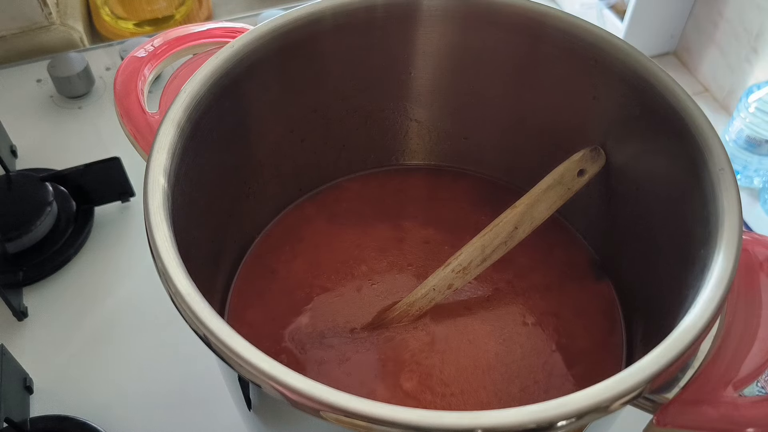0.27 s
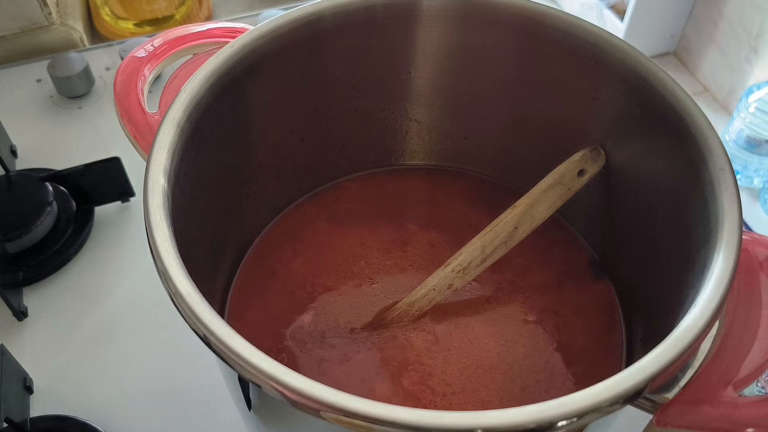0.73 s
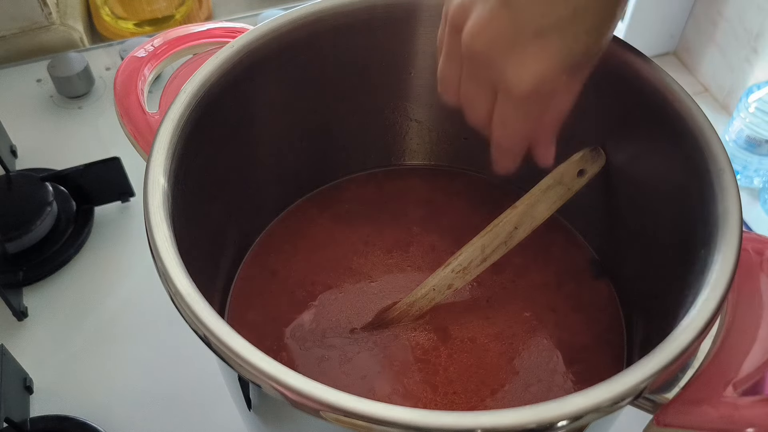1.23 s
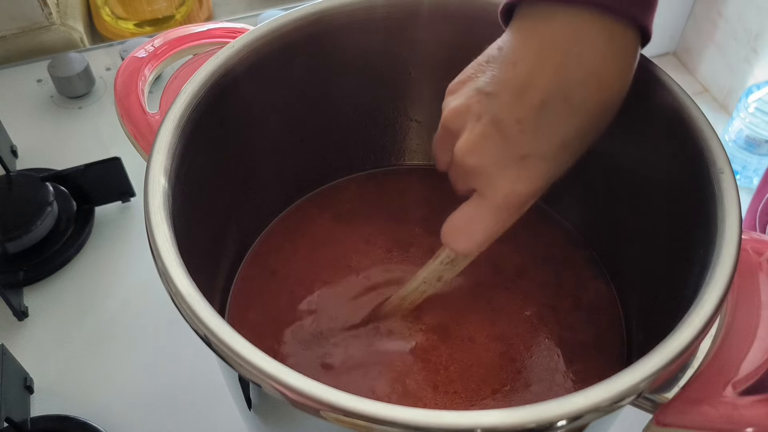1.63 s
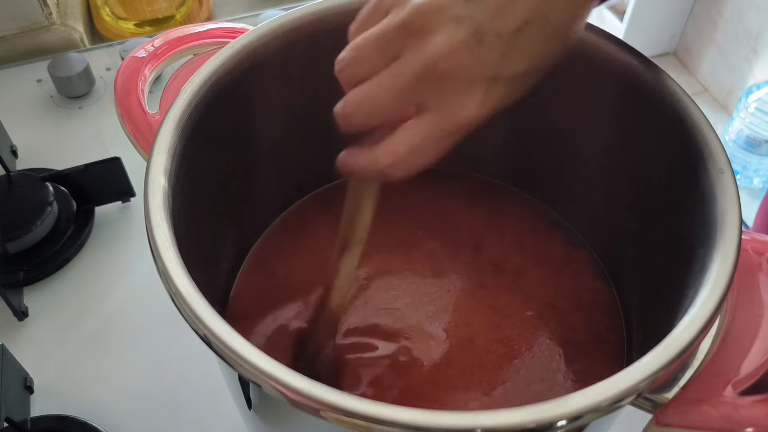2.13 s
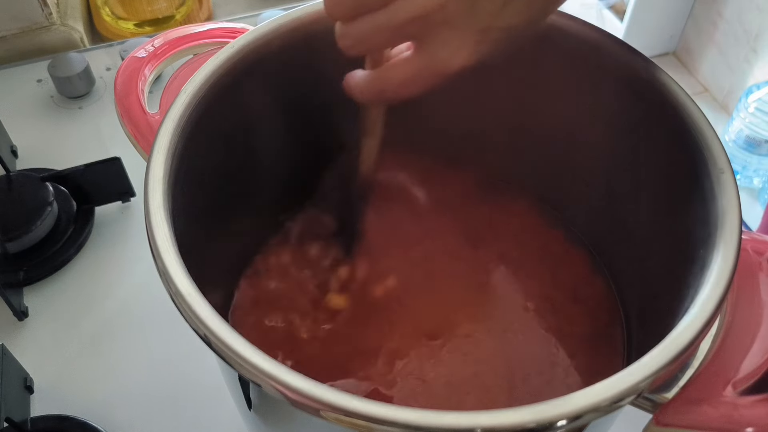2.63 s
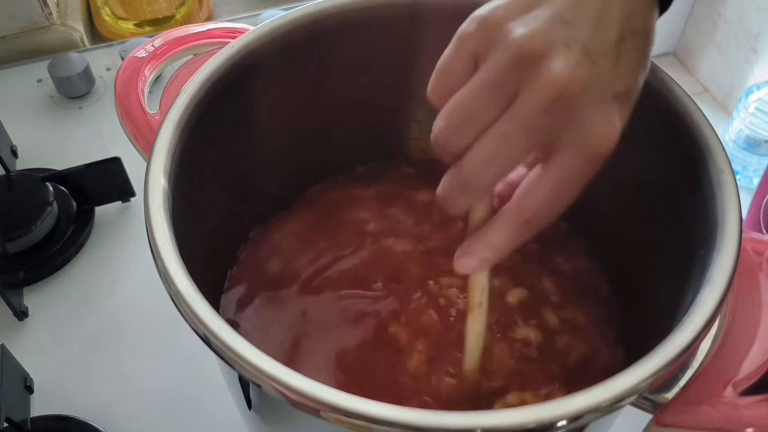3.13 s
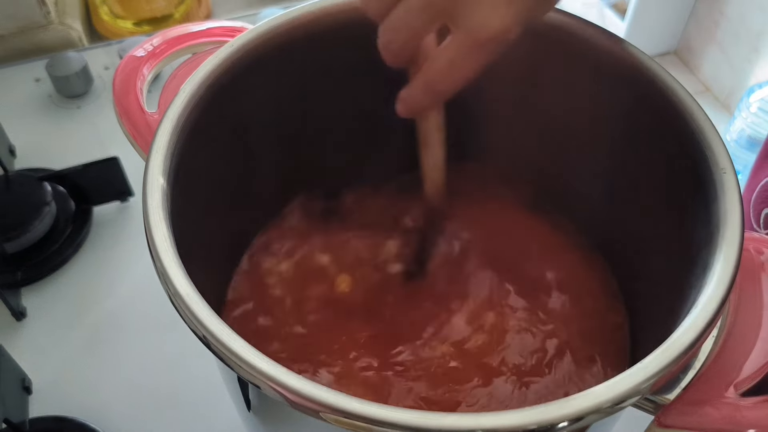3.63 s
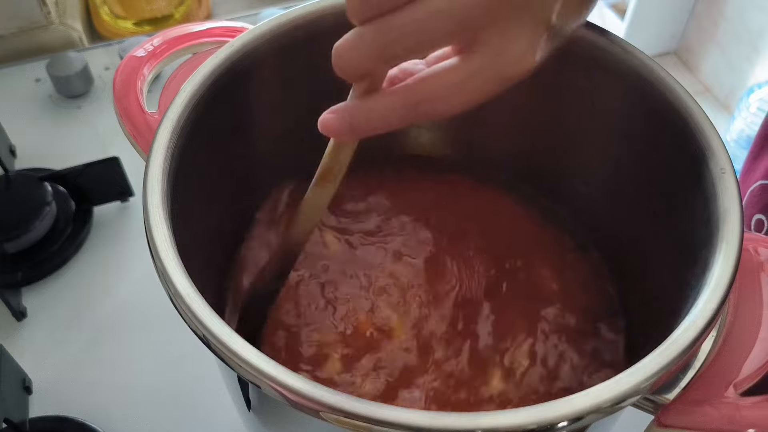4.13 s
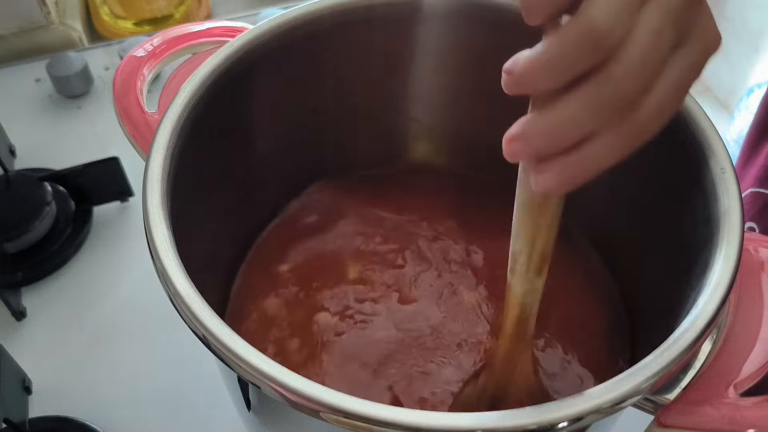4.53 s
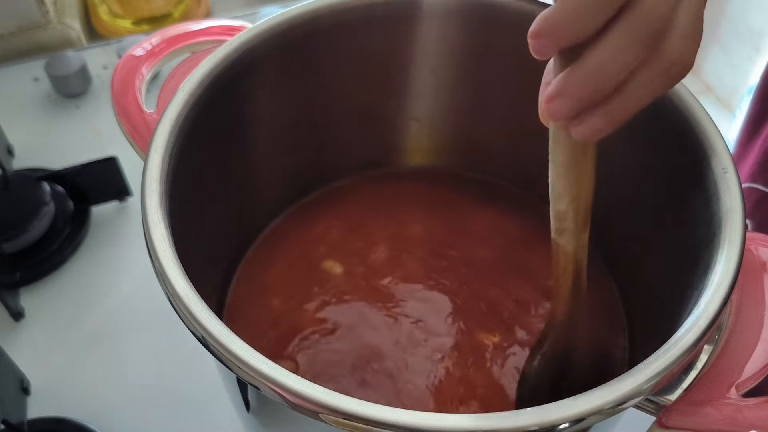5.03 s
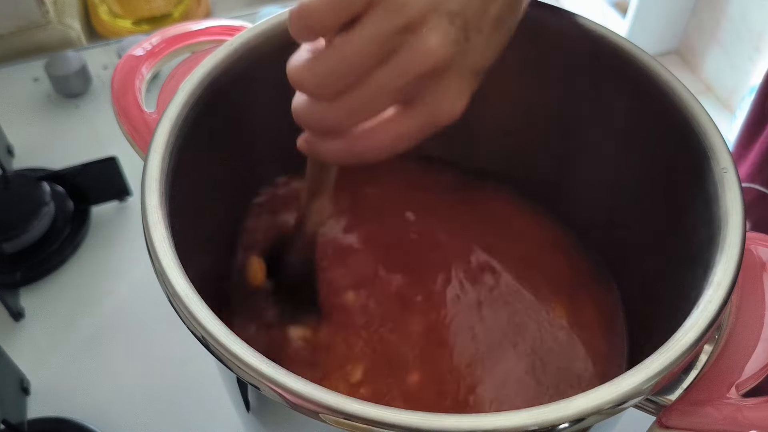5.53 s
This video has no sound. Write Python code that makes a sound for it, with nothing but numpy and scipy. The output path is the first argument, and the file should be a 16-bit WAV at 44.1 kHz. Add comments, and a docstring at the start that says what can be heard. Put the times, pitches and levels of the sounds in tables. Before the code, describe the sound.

A metal lid clatters down on a stove grate, then after a pause a spoon stirs watery stew with plops, ticks and soft pot knocks.

```python
"""A wooden spoon stirs watery stew in a tall steel pot: ringing air pockets plop, tiny bubbles crack and tick,
flowing noise and minute grains make the swish, and damped modes ring as the spoon bumps the wall.
Before the stirring, a steel lid clanks down on the hob nearby: bursts of rattle with ringing metal modes.
Throughout, the gas burner rushes as coloured noise and a fridge hums in unsteady tones in the small kitchen,
over the microphones' own faint, peaked hiss."""
import sys
import numpy as np
from scipy import signal
from scipy.fft import rfft, irfft, next_fast_len
from scipy.io import wavfile
from scipy.ndimage import map_coordinates

SR = 44100
rng = np.random.default_rng(int(sys.argv[2]) if len(sys.argv) > 2 else 0)


def digitize_waveform(pressure):
    """Quantize a signal to 16-bit integers and store it at the path in sys.argv[1].

    Rows of a 2-D input are taken as channels; values are limited to [-1, 1].
    """
    field = np.atleast_2d(pressure).T
    bounded = np.clip(field, -1, 1)
    quanta = np.round(bounded * 32767).astype(np.int16)
    wavfile.write(sys.argv[1], SR, quanta)


N = 255118  # length in samples
T = np.arange(SR // 2) / SR  # clock of one short sound, in seconds

# Burner and kitchen air, tone colour. Each row: frequency in Hz, relative level in dB.
AIR_COLOUR = [(25, -27), (45, -22), (75, -1), (130, 0), (250, -0.5), (400, -2), (750, -11.5), (1400, -9),
              (2100, -16), (3000, -21.5), (3700, -15.5), (4800, -17.5), (7000, -19), (9300, -13),
              (10300, -23), (16000, -18.5)]
# Narrow peaks in the microphones' own faint hiss. Each row: centre in Hz, width in Hz, relative level in dB.
HISS_PEAKS = [(1409, 63, -4), (5274, 300, -8.5), (6740, 170, -12.5), (8230, 102, -3), (9144, 284, -5.5),
              (12270, 250, -13.5)]
# Fridge motor and mains tones. Each row: frequency in Hz, typical rms level in dB.
FRIDGE_TONES = [(61.5, -70), (100, -59), (246, -69.5), (307.5, -72.5), (399, -77)]
# How alike left and right are in noise. Each row: frequency in Hz, likeness from -1 to 1.
STEREO_LIKENESS = [(60, 0.99), (150, 0.69), (380, 0.46), (950, -0.04), (2380, 0.0048), (5980, -0.019),
                   (15000, 0.01)]

# A steel lid set down on the hob's grate. Each row: start in seconds, clatter level in dB,
# lid ring level in dB, contact brightness in Hz.
LID_CLANKS = [(0.001, -30.5, -35.5, 2720), (0.026, -28, -35.5, 2160), (0.055, -33, -52, 1960),
              (0.067, -32.5, -74, 800), (0.2168, -27.5, -41.5, 2270), (0.2220, -26.5, -43, 2190),
              (0.2812, -36, -53, 4500), (0.284, -23.5, -49, 4070), (0.297, -41, -52, 3000),
              (0.342, -39, -65, 960), (0.414, -32, -82, 397)]
# Tone colour of the rattle. Each row: frequency in Hz, relative level in dB.
CLATTER_COLOUR = [(40, -52), (80, -43), (110, -11), (280, -9), (420, -11), (620, 5.5), (900, -7.5),
                  (1600, -6), (2300, -8.5), (3200, -17.5), (5500, -23), (9000, -16.5), (16000, -23)]
# Thud of the wooden worktop. Each row: mode in Hz, relative level in dB, t60 in seconds.
WORKTOP_MODES = [(109.3, -24, 0.63), (236, -15.5, 0.14), (269, -16.5, 0.18), (591, -1.5, 0.075),
                 (645, -0.5, 0.055), (766, -12, 0.064), (855, -19.5, 0.17), (1009, -20, 0.32),
                 (1406, -21, 0.18), (1604, -5.5, 0.07)]
# Ring of the lid. Each row: mode in Hz, relative level in dB, t60 in seconds.
LID_MODES = [(2223, 8.5, 0.21), (2110, -8, 0.054), (3210, -23.5, 0.71), (6900, -18, 0.4), (8200, -17, 0.15)]
# Ring of the grate. Each row: mode in Hz, relative level in dB, t60 in seconds.
GRATE_MODES = [(3616, -4.5, 0.27), (4420, 5, 0.098), (4448, 0, 0.083), (7290, -3, 0.18), (8270, 0, 0.073),
               (11040, 5, 0.077)]
GRATE_DB = -17  # the grate's ring against the clatter
# Echo of the kitchen. Each row: frequency in Hz, t60 in seconds.
KITCHEN_DECAY = [(150, 0.29), (700, 0.35), (3000, 0.28), (12000, 0.23)]

# How hard the stew is churned: brisk turns, slow ones, then brisk again.
# Each row: time in seconds, strength in dB.
CHURN_STRENGTH = [(2.3, -29), (2.55, -7), (2.82, 4), (3.03, 0), (3.2, -7), (3.6, -3), (3.95, -20),
                  (5.15, -20), (5.45, -5), (5.78, 0)]
# Large air pockets closing behind the spoon. Each row: start in seconds, ring level in dB,
# starting pitch in Hz, t60 in seconds, snap level in dB.
AIR_POCKETS = [(2.294, -47.5, 500, 0.03, -63), (2.5197, -43.5, 1643, 0.081, -37.5),
               (2.55, -44, 1520, 0.041, -38), (2.632, -29.5, 845, 0.021, -29.5),
               (2.701, -49, 515, 0.057, -50), (2.88, -29.5, 1057, 0.03, -24),
               (2.9596, -45, 1580, 0.016, -33), (2.9885, -37.5, 694, 0.026, -44),
               (3.748, -48, 408, 0.069, -62), (5.2843, -38, 1108, 0.049, -27),
               (5.294, -32.5, 1690, 0.019, -29), (5.399, -38, 518, 0.023, -60),
               (5.413, -48.5, 1920, .025, -45), (5.537, -52.5, 2270, 0.036, -43.5),
               (5.6328, -35.5, 987, 0.087, -35), (5.7344, -46.5, 1564, .067, -42)]
SNAP_HZ, SNAP_REF_DB, SNAP_DB_PER_OCTAVE = 3500, -31, 8.5  # a harder snap is brighter
# Standing waves in the air above the stew. Each row: centre in Hz, width in Hz, level in dB.
POT_AIR_MODES = [(704, 3.7, 5), (1108, 37, 2.5), (1470, 13, -9), (1662, 14, 6), (2117, 27, 10.5)]
# Echo of the air in the pot. Each row: frequency in Hz, t60 in seconds.
HOLLOW_DECAY = [(300, 0.17), (1000, 0.14), (2500, 0.072), (6000, 0.04), (14000, 0.02)]

# The spoon's blade sweeping through the surface. Each row: middle in seconds, level in dB,
# half length in seconds.
BLADE_SWEEPS = [(2.903, -57, 0.028), (3.774, -52, 0.06), (4.421, -58.5, 0.049), (4.897, -63, .046),
                (5.278, -65, .035)]
# Tone colour of the stew's wash. Each row: frequency in Hz, relative level in dB.
WASH_COLOUR = [(200, -34), (400, 3), (700, 0), (1000, -10), (1500, -7), (2400, -6), (3700, -6),
               (5000, -7.5), (6300, -0.5), (9000, -9.5), (12000, -9), (16000, -9)]
CHURN_WASH_DB = -64.5  # flow level at a churn of 0 dB

# Loud small bubbles bursting. Each row: start in seconds, relative level in dB, starting pitch in Hz,
# crack level against the ring in dB.
SMALL_BUBBLES = [(2.5448, -37, 4640, -2), (2.577, -34.5, 8270, -8), (2.7012, -36.5, 6050, -21),
                 (2.7067, -30.5, 5600, 2), (2.7252, -41.5, 5700, 7), (2.7516, -39, 4640, -12),
                 (2.8072, -40.5, 6660, -2), (2.85, -36.5, 5650, 7), (2.863, -36.5, 5850, 2),
                 (2.8937, -41, 4670, 11), (3.181, -45, 4370, 1), (3.3336, -35, 8500, -6),
                 (3.4342, -38.5, 3630, -4), (3.5932, -42.5, 6700, 3), (3.7997, -38.5, 5650, 9),
                 (5.2845, -32, 2560, 4), (5.467, -35, 6200, -9), (5.7135, -37.5, 8150, -8),
                 (5.733, -38, 3800, 3)]
CRACK_OVER_RING = 1.38  # a tiny bubble's crack lies higher than its ring

# The faint bubbles that churning leaves: typical level and pitch, and their scatter either way.
FAINT_TICK_DB, FAINT_TICK_HZ, FAINT_CRACK_DB = -47, 11050, 1
FAINT_PLOP_DB, FAINT_PLOP_HZ, FAINT_PLOP_T60_S, FAINT_SNAP_DB = -52, 1189, 0.045, -56
SCATTER_DB, SCATTER_OCTAVES = 6.5, 0.41

# The spoon bumping the pot. Each row: start in seconds, level in dB, contact brightness in Hz.
SPOON_BUMPS = [(4.32, -52.5, 700), (4.7497, -38.5, 3400), (4.759, -37, 605), (4.816, -45.5, 400),
               (5.250, -44, 450)]
# Ring of the filled pot. Each row: mode in Hz, relative level in dB, t60 in seconds.
POT_MODES = [(197.7, -12, 0.48), (240, -2, 0.18), (408, -10, 0.25), (443, -3.5, 0.099), (480, -0.5, 0.069),
             (626, -6.5, 0.11), (717, -13.5, 0.27), (913, -11.5, 0.19), (1125, -3, 0.11), (1400, -17, 0.14),
             (1717, -10, 0.12), (2900, 3, 0.024), (2950, -3, 0.024)]

# Colour of the two microphone ports. Each row: frequency in Hz, left gain in dB, right gain in dB.
PORT_COLOUR = [(430, 0.5, 0.5), (686, -1, -1.5), (1400, -1, 1), (2300, -2, -1), (4930, 2.5, 0.5),
               (5550, -1, 3), (7220, 2, 7), (7610, 0, 5.5), (8380, 9, -15.5), (8730, 3, -18), (9740, 0, -6),
               (10400, 0, -7), (11500, 0.5, -5), (14100, -5.5, -6.5)]
TOP_HZ = 16000  # nothing is kept from here up


def amp(db):
    """Decibels to gain."""
    return 10 ** (np.asarray(db) / 20)


def unit(x):
    """Bring x to rms 1."""
    return x / np.sqrt(np.mean(x ** 2) + 1e-20)


def along(points, hz):
    """Read (Hz, value) points at hz, on a log frequency axis."""
    f, value = np.transpose(points)
    return np.interp(np.log(hz + 1), np.log(f + 1), value)


def filtered(x, response):
    """Shape the spectrum of x by a response of frequency."""
    n = x.shape[-1]
    padded = next_fast_len(n + 8192)
    spectrum = rfft(x, padded) * response(np.fft.rfftfreq(padded, 1 / SR))
    return irfft(spectrum, padded)[..., :n]


def wobble(rate):
    """A smooth random curve with rate knots a second."""
    knots = rng.standard_normal(int(N * rate / SR) + 4)
    return map_coordinates(knots, [np.arange(N) * rate / SR])


def panned(lean_db):
    """Left and right gains; a positive lean favours the left."""
    return amp(np.array([[1], [-1]]) * lean_db / 2)


def noise(gain, size):
    """Coloured stereo noise of rms 1, near mono in the bass."""
    def mid_side_gains(hz):
        turn = np.arccos(np.clip(along(STEREO_LIKENESS, hz), -1, 1)) / 2
        return gain(hz) * np.array([np.cos(turn), np.sin(turn)])

    mid, side = filtered(rng.standard_normal((2, size)), mid_side_gains)
    return unit(np.array([mid + side, mid - side]))


def add(track, s, sound):
    """Mix a sound into the track at time s."""
    start = max(round(s * SR), 0)
    track[:, start:start + sound.shape[-1]] += sound[:, :max(N - start, 0)]


def ring(modes, contact, spread_hz):
    """Modes struck through a contact; high ones reach the two microphones out of step."""
    hz, db, t60 = np.transpose(modes)[:, :, None]
    phase = rng.standard_normal((2, len(modes), 1)) * np.minimum(hz / spread_hz, 2)
    level = amp(db + rng.standard_normal(hz.shape)) * contact(hz)
    partials = level * amp(-60 * T / t60) * np.sin(2 * np.pi * hz * T + phase)
    return np.sum(partials, axis=1) * (1 - np.exp(-T / 0.00067))


def echo(x, decay, delay):
    """A fresh diffuse tail for a short sound, each frequency dying at its own speed."""
    hz, t, cells = signal.stft(rng.standard_normal((2, len(T))), SR, nperseg=256)
    fading = cells * amp(-60 * t / along(decay, hz)[:, None])
    tail = signal.istft(fading, SR, nperseg=256)[1][:, :len(T)] * (T > delay)
    return signal.fftconvolve(x, tail / np.linalg.norm(tail[0]), axes=1)[:, :len(T)]


def ripple(hz, spacing_hz, depth_db):
    """Reflections from hob and walls comb a steady sound with fixed, randomly placed peaks and dips."""
    knots = rng.standard_normal(1024)
    curve = map_coordinates(knots, [hz / spacing_hz], mode="mirror")
    return amp(depth_db * curve * hz / (hz + 500))  # shallower in the bass


def burner():
    """The flame's steady rush, with the kitchen air, as coloured noise that wavers slightly."""
    def gain(hz):
        return amp(along(AIR_COLOUR, hz)) * ripple(hz, spacing_hz=44.03, depth_db=3.0)

    return noise(gain, N) * amp(-58.5 + 0.44 * wobble(5.02))


def microphone_hiss():
    """The microphones' thin, peaked hiss: noise gathered into narrow bands."""
    def gain(hz):
        power = sum(amp(db) ** 2 / (1 + (2 * (hz - c) / w) ** 2) ** 2.6 for c, w, db in HISS_PEAKS)
        return np.sqrt(power)

    return amp(-65) * noise(gain, N)


def fridge():
    """Motor and mains tones, slightly unsteady in level and timing."""
    t = np.arange(N) / SR
    hum = np.zeros(N)
    for hz, db in FRIDGE_TONES:
        level = amp(db + 1.1 * wobble(3.68))
        hum += level * np.sin(2 * np.pi * hz * (t + 0.00038 * wobble(2.93)))
    return np.sqrt(2) * hum * panned(lean_db=1.5)  # root 2 takes rms to peak


def beating(hz):
    """A lid is never quite round: its modes come in close pairs that beat."""
    return np.cos(np.pi * hz * T)


def kitchenware():
    """Contacts rattle, thud through the wooden worktop and ring lid and grate; soft ones barely wake treble or
    grate."""
    out = np.zeros((2, N))
    for s, clatter_db, lid_db, edge_hz in LID_CLANKS:
        treble_floor = amp(-17.0) * min(edge_hz / 2800, 1.7) ** 2
        contact = lambda hz: 1 / (1 + (hz / edge_hz) ** 10) + treble_floor
        rattle = filtered(noise(lambda hz: amp(along(CLATTER_COLOUR, hz)), len(T)), contact)
        rattle *= amp(-60 * T / 0.068) * (1 - np.exp(-T / 0.00033))
        thud = amp(-3) * ring(WORKTOP_MODES, contact, spread_hz=1650)
        lid = amp(lid_db) * ring(LID_MODES, np.ones_like, spread_hz=2750) * beating(hz=5.4)
        grate = amp(GRATE_DB) * ring(GRATE_MODES, contact, spread_hz=6500)
        blow = amp(clatter_db) * (rattle + thud + grate) + lid
        add(out, s, blow + amp(-9.5) * echo(blow, KITCHEN_DECAY, delay=0.011))
    return out * panned(lean_db=-0.3)


def churn(s):
    """Strength of the churning at times s, as a gain."""
    return amp(np.interp(s, *np.transpose(CHURN_STRENGTH))) * (s > CHURN_STRENGTH[0][0])


def stirred_up(db, hz, count):
    """Rows (s, dB, pitch Hz) of chance bubbles: the harder the churning, the more of them."""
    when, size, pitch = rng.random((count, 3)).T
    now = np.arange(N) / SR
    air = np.cumsum(churn(now))  # air folded in so far
    s = np.interp((np.arange(count) + when) / count, air / air[-1], now)
    level_db = db + SCATTER_DB * (2 * size - 1)
    return zip(s, level_db, hz * 2 ** (SCATTER_OCTAVES * (2 * pitch - 1)))


def bubble(hz, t60, climb, attack, skew):
    """A bubble rings; its pitch climbs by a share per second as it nears the surface."""
    phase = 2 * np.pi * np.cumsum(hz * (1 + climb * np.minimum(T, t60))) / SR
    tone = np.sin(phase + skew * np.array([[1], [-1]]))  # skew sets left and right out of step
    return tone * amp(-60 * T / t60) * (1 - np.exp(-T / attack))


def snap(hz, t60):
    """A broad burst of noise round hz, as a film of liquid tears."""
    burst = noise(lambda f: 1 / np.sqrt(1 + 0.45 * (f / hz - hz / (f + 1)) ** 2), len(T))
    return burst * amp(5 - 60 * T / t60) * (1 - np.exp(-T / 0.00047))


def in_pot(x, hollow_db, room_db):
    """A sound bounces between steel walls, rings the air in the pot, then escapes into the kitchen."""
    def resonance(f):
        return sum(amp(db) * 1j * f * w / (c * c - f * f + 1j * f * w) for c, w, db in POT_AIR_MODES)

    standing = filtered(x, resonance)
    hollow = amp(hollow_db) * echo(x, HOLLOW_DECAY, delay=0.00079)
    return x + standing + hollow + amp(room_db) * echo(x, KITCHEN_DECAY, delay=0.006)


def plops():
    """The film over an air pocket snaps and the pocket rings."""
    out = np.zeros((2, N))
    chance = stirred_up(FAINT_PLOP_DB, FAINT_PLOP_HZ, count=9)
    faint = [(s, db, hz, FAINT_PLOP_T60_S, FAINT_SNAP_DB) for s, db, hz in chance]
    for s, db, hz, t60, snap_db in AIR_POCKETS + faint:
        tone = amp(db) * bubble(hz, t60, climb=2.97, attack=0.00034, skew=0.27)
        snap_hz = SNAP_HZ * 2 ** ((snap_db - SNAP_REF_DB) / SNAP_DB_PER_OCTAVE)
        tear = amp(snap_db) * snap(snap_hz, t60=0.0039)
        add(out, s, in_pot(tone, hollow_db=-8, room_db=-8.5) + in_pot(tear, hollow_db=-3, room_db=-5))
    return out * panned(lean_db=0.8)


def swish(count=1500):
    """Stew slides over the spoon: a soft wash with a fizz of minute bubbles, both following the flow."""
    now = np.arange(N) / SR
    sweeps = sum(amp(db) * np.exp(-((now - s) / half) ** 2) for s, db, half in BLADE_SWEEPS)
    flow = amp(CHURN_WASH_DB) * churn(now) + sweeps
    wash = noise(lambda hz: amp(along(WASH_COLOUR, hz)), N)
    fizz = np.zeros((2, N))
    t = T[:SR // 50]
    for when, pitch, size, lean in rng.random((count, 4)):
        hz = 13000 / 13 ** (pitch ** 2)  # small, high bubbles are the most common
        grain = size ** 6 * hz ** 0.29 * np.sin(2 * np.pi * hz * t) * amp(-60 * t * hz / 22)
        add(fizz, when * N / SR, grain * panned(10 * (lean - 0.5)))
    return flow * (amp(1.5) * wash + amp(-10) * unit(fizz))


def ticks():
    """Tiny bubbles burst all over the surface: a sharp crack and a short ring."""
    out = np.zeros((2, N))
    chance = stirred_up(FAINT_TICK_DB, FAINT_TICK_HZ, count=20)
    faint = [(s, db, hz, FAINT_CRACK_DB) for s, db, hz in chance]
    for s, db, hz, crack_db in SMALL_BUBBLES + faint:
        tone = bubble(hz, 40 / hz, climb=8.8, attack=0.00019, skew=0.74)
        pop = tone + amp(crack_db) * snap(CRACK_OVER_RING * hz, t60=0.0034)
        place = panned(lean_db=1.0 + 2.3 * rng.standard_normal())
        level = amp(db + 1)  # 1 dB is the overall level of the ticks
        add(out, s, level * place * in_pot(pop, hollow_db=-0.5, room_db=-12.5))
    return out


def spoon():
    """Wood bumps the pot with a crack of noise and wakes its ring, which the stew damps."""
    out = np.zeros((2, N))
    for s, db, edge_hz in SPOON_BUMPS:
        contact = lambda hz: 1 / (1 + (hz / edge_hz) ** 4)
        crack = noise(lambda hz: hz / (hz + 300) / (1 + (hz / edge_hz) ** 2), len(T))
        crack *= amp(-7.5 - 60 * T / 0.062)
        blow = amp(db) * (ring(POT_MODES, contact, spread_hz=1100) + crack)
        add(out, s, blow + amp(-8) * echo(blow, KITCHEN_DECAY, delay=0.0085))
    return out * panned(lean_db=1.0)


def scene():
    """Everything heard from just above the pot, with the microphones' hiss."""
    background = burner() + microphone_hiss() + fridge()
    return background + kitchenware() + plops() + swish() + ticks() + spoon()


def record(dry):
    """Each microphone port colours the sound its own way, and the top of the band is cut off."""
    f, *ports = np.transpose(PORT_COLOUR)
    return filtered(dry, lambda hz: amp([np.interp(hz, f, db) for db in ports]) * (hz < TOP_HZ))


dry = scene()
out = record(dry)
digitize_waveform(out)
```